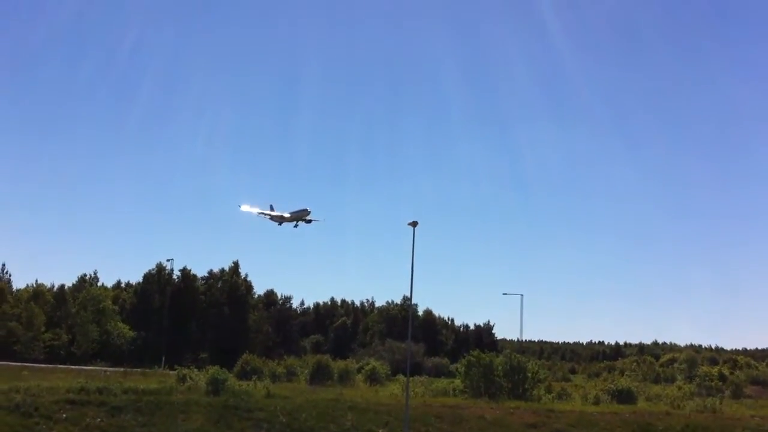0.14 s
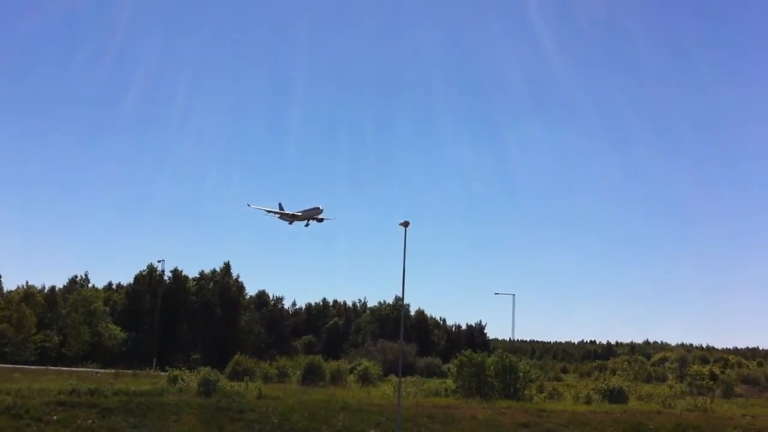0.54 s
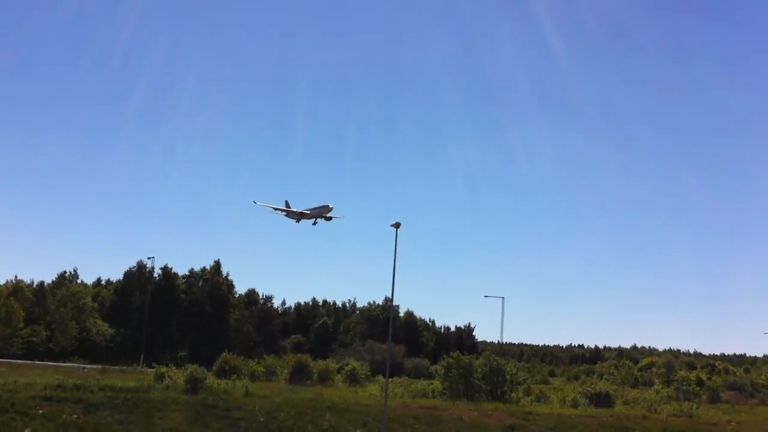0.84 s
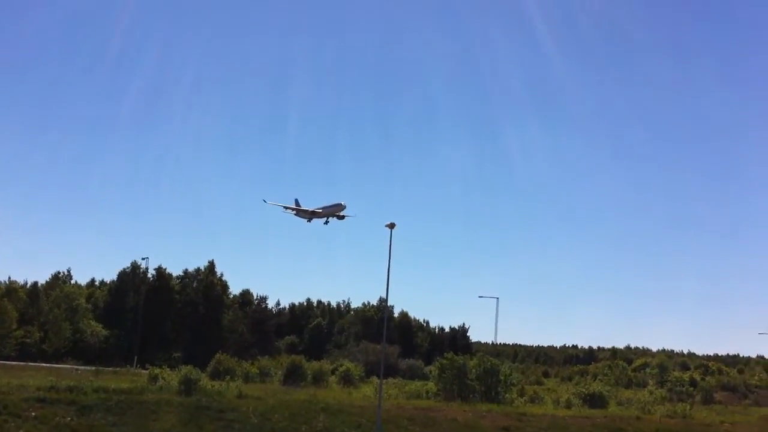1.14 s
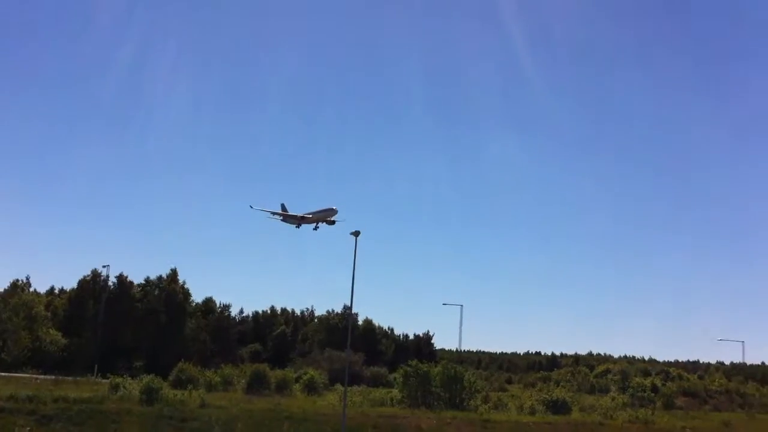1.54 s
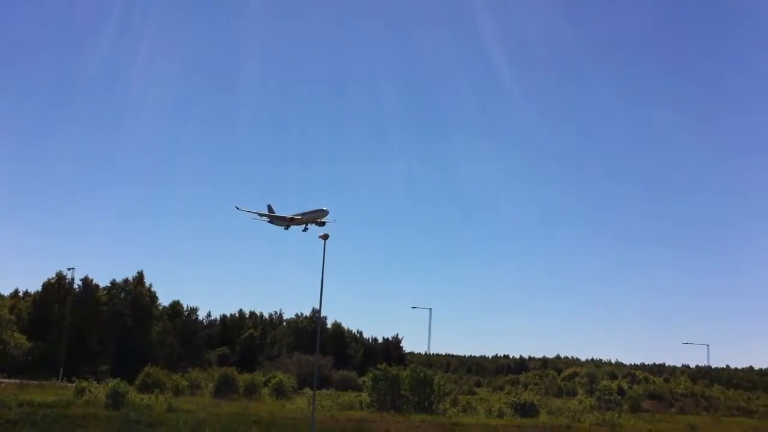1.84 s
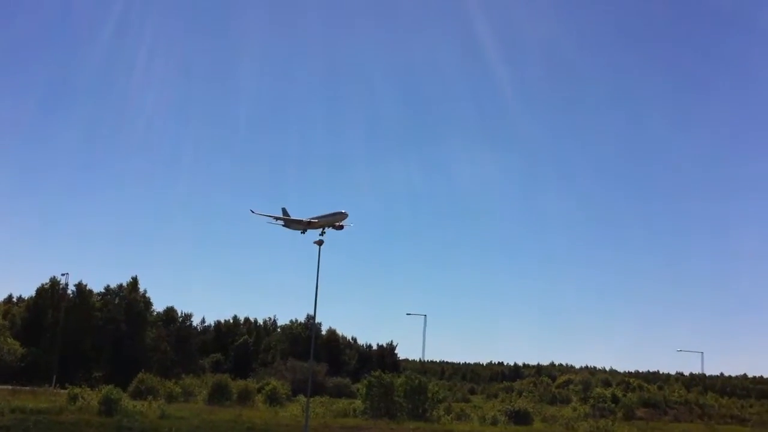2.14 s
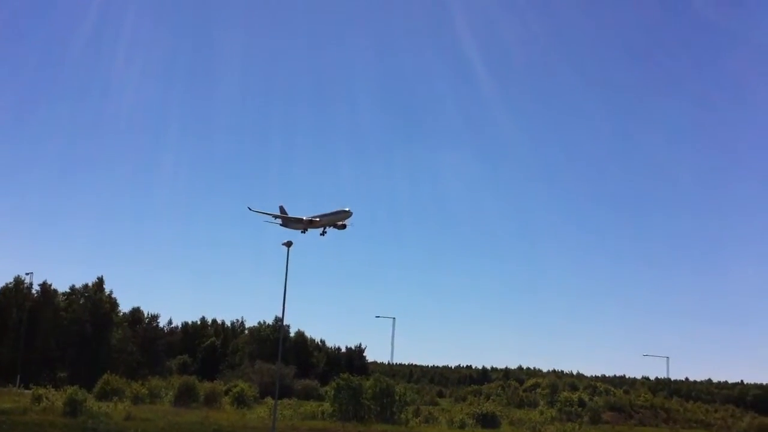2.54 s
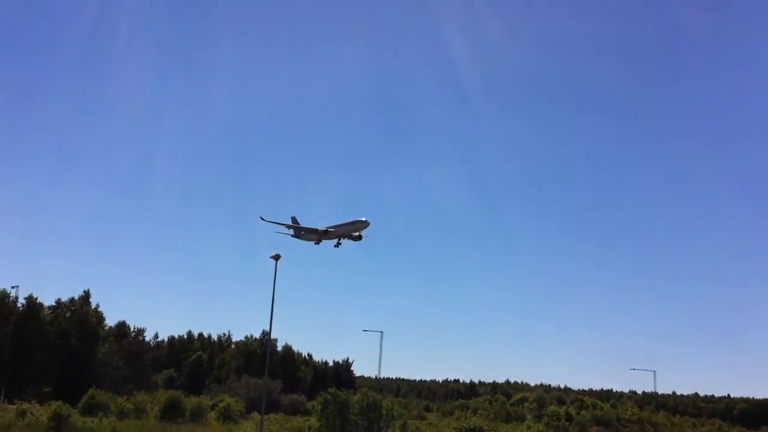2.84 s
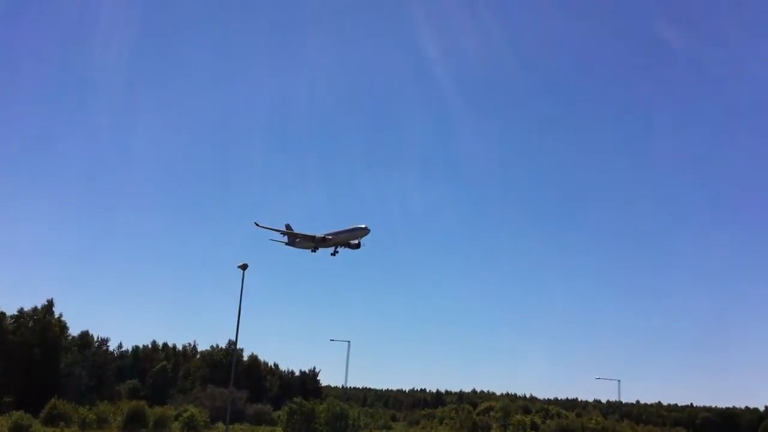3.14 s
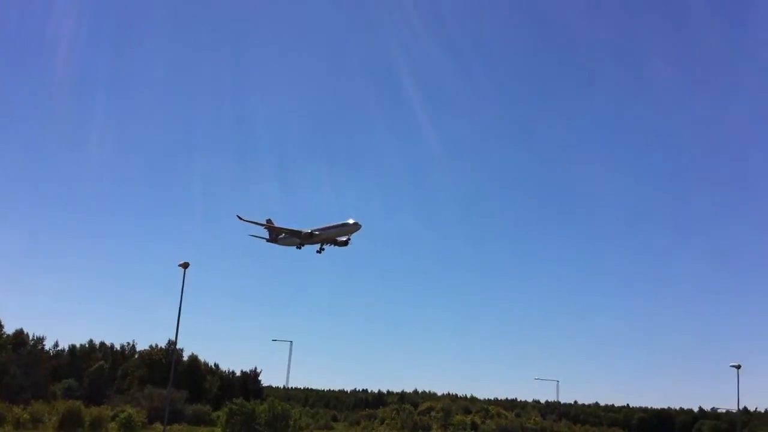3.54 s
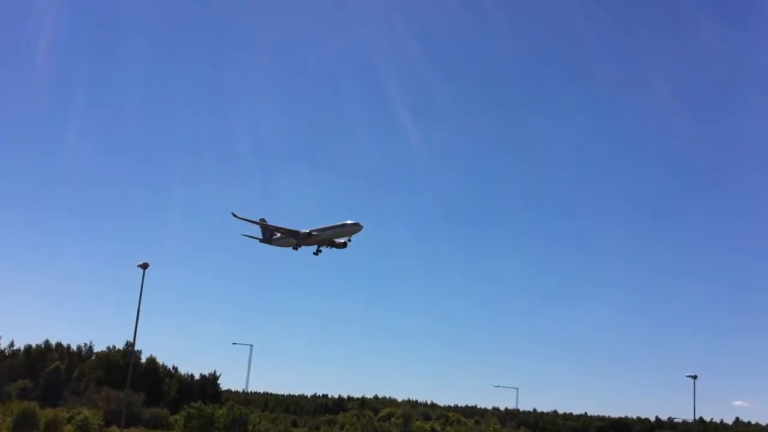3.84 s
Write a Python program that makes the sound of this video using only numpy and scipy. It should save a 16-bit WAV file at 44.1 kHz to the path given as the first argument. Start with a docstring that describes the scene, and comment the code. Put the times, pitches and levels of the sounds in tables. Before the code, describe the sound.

A jet airliner passes low over an open field, its rushing roar swelling and dipping under a whine that sinks in pitch; wind gusts flutter on the unshielded microphone, building to dense thumps and cracks.

```python
"""The roar of a jet airliner throughout, low over a windy field: noise mottled by the air and echoed by the ground.
Under its whine lies a rush of fan noise; whine and engine tones are blurred sines sinking as it draws level.
Gusts shake the microphone as fluttering noise, brighter the harder they blow, with crackle in the strong ones.
Short buffets slap and thump, bright spikes crack among them; a thin hiss, high-pitched noise, passes early on."""
import sys
import numpy as np
from scipy import signal
from scipy.fft import rfft, irfft
from scipy.io import wavfile
from scipy.ndimage import uniform_filter1d, minimum_filter1d, map_coordinates

SR = 44100
rng = np.random.default_rng(int(sys.argv[2]) if len(sys.argv) > 2 else 0)


def pcm_store(signal):
    """Save signal as 16-bit PCM."""
    levels = np.round(np.clip(np.atleast_2d(signal), -1, 1) * 32767)
    wavfile.write(sys.argv[1], SR, levels.astype(np.int16).T)


N = 176400
T = np.arange(N) / SR


def amp(db):
    """Decibels to amplitude gain."""
    return 10 ** (np.asarray(db) / 20)


def unit(x):
    """Scales to rms 1."""
    return x / np.sqrt(np.mean(x ** 2) + 1e-20)


def curve(rows):
    """The second column of a table against time, at every sample."""
    return np.interp(T, *np.transpose(rows)[:2])


def colour(rows, hz, axis=1):
    """One column of a spectrum table in dB, on a log-frequency axis."""
    rows = np.array(rows, float)
    return np.interp(np.log(hz + 1), np.log(rows[:, 0]), rows[:, axis])


def noise(rows, axis=1):
    """Steady noise of the given colour, rms 1."""
    hz = np.fft.rfftfreq(N, 1 / SR)
    white = rfft(rng.standard_normal(N))
    return unit(irfft(white * amp(colour(rows, hz, axis=axis)), N))


def wander(hz):
    """Smooth random motion of rms 1, its spectrum falling to 1/e at the given rate."""
    f = np.fft.rfftfreq(N, 1 / SR)
    slow = np.exp(-(f / hz) ** 2) * (f > 0)  # no constant offset
    return unit(irfft(rfft(rng.standard_normal(N)) * slow, N))


def steady(x, size=1500):
    """Divides a noise by its running level, averaged over windows of size samples, to even it out."""
    power = uniform_filter1d(uniform_filter1d(x ** 2, size), size)
    return x / np.sqrt(abs(power) + 1e-9)


# level of the jet's roar as heard, with its dips, before gain and swell: (time [s], level [dB])
ROAR_LEVEL = [(0, -39), (.25, -37.5), (.42, -36), (.5, -32.5), (.62, -32.5), (.8, -33), (1.05, -35),
              (1.37, -35), (1.58, -41), (1.64, -45), (1.9, -45.5), (2.28, -39), (2.46, -38.5),
              (2.65, -35.5), (2.8, -49), (2.95, -50), (3.2, -47), (3.4, -36), (3.68, -31.5), (4, -38)]
# roar spectrum, relative: (frequency [Hz], far level [dB per Hz], near level [dB per Hz])
ROAR_COLOUR = [(40.3, -24.5, -20.5), (150, 1.5, 7), (410, -10, 17.5), (580, 10, 19), (710, -3.5, 9),
               (960, 7, 6.5), (1170, 4.5, 8), (1680, 6.5, 3), (1820, 2.5, 0.5), (2300, 0, 0),
               (3050, -11.5, -8), (3260, -23, -23), (3800, -30.5, -33), (4980, -31, -27), (6900, -51, -58),
               (9700, -78, -76)]
ROAR_DB, ROAR_SWELL_DB, ROAR_PATCH_DB = 7, .5, 2  # gain, then rms depth of the two random motions
# the ground echo lags more as the jet climbs in the sky
ECHO_START_S, ECHO_END_S, ECHO_SHARE = 0.00264, 0.0052, 0.09


def roar():
    """Jet noise, mottled by turbulent air and combed by its echo from the ground."""
    frames, hz = N // 256 + 5, np.fft.rfftfreq(1024, 1 / SR)
    real, imaginary, patches = rng.standard_normal((3, frames, len(hz)))
    # patches of loud and soft, smooth over time and frequency
    patches = uniform_filter1d(patches, size=16, axis=0)
    patches = unit(uniform_filter1d(patches, size=7, axis=1))
    near = np.linspace(0, 1, frames)[:, None]
    far_db, near_db = colour(ROAR_COLOUR, hz, axis=1), colour(ROAR_COLOUR, hz, axis=2)
    db = (1 - near) * far_db + near * near_db
    field = (real + 1j * imaginary) * amp(db + ROAR_PATCH_DB * patches)
    direct = signal.istft(field.T, nperseg=1024, noverlap=768)[1][:N]
    lag = np.linspace(ECHO_START_S, ECHO_END_S, N)
    echo = map_coordinates(direct, [(T - lag) * SR], order=3)
    level_db = curve(ROAR_LEVEL) + ROAR_DB + ROAR_SWELL_DB * wander(7.7)
    return unit(direct + ECHO_SHARE * echo) * amp(level_db)


# the fan's rush, before its random waver: (time [s], level [dB])
RUSH_LEVEL = [(0, -40), (.25, -55), (.6, -35.5), (.85, -46), (1.05, -37.5), (1.35, -49), (1.65, -48),
              (1.9, -51), (2.05, -43), (2.3, -44), (2.5, -52), (2.65, -51), (2.9, -56.5), (3.5, -46.5),
              (4, -63)]
# rush spectrum, relative: (frequency [Hz], level [dB per Hz])
RUSH_COLOUR = [(1200, -32.5), (1950, -13), (2200, 2), (2420, -3.5), (2680, -12), (3050, -20), (3400, -28),
               (4100, -38.5), (8000, -69)]


def rush():
    """The band of broad fan noise just under the whine, its level wavering by 1 dB rms."""
    return noise(RUSH_COLOUR) * amp(curve(RUSH_LEVEL) + wander(25))


# pitch of the fan whine, before its wobble: (time [s], pitch [Hz])
WHINE_PITCH = [(0, 3905), (.5, 3820), (1.5, 3612), (3, 3255), (3.5, 3158), (4, 3068)]
# level of the whine, before its fading: (time [s], level [dB])
WHINE_LEVEL = [(0, -63), (.55, -67), (1.05, -59.5), (1.3, -58), (1.48, -64), (1.9, -63.5), (2.15, -59),
               (2.55, -56.5), (2.95, -67), (3.3, -59), (3.65, -48), (4, -61)]
# engine tones, levels against the whine:
# (multiple of whine pitch [ratio], level at start [dB], level at end [dB], width [Hz])
TONES = [(.972, -6, -10, 130), (1.455, -20, -14, 120), (1.315, -19, -15, 150), (1.045, -9, -20, 150),
         (.335, 22, -25, 30)]
WHINE_FADE_DB, WHINE_WOBBLE_HZ, WHINE_BLUR = 1.5, 6, .55  # rms depths; blur as a share of the tone


def whine():
    """A thin fan tone and fuzzier engine tones that sink together and waver in the air."""
    pitch_hz = curve(WHINE_PITCH) + WHINE_WOBBLE_HZ * wander(38)
    phase = 2 * np.pi * np.cumsum(pitch_hz) / SR
    in_step = (1 + WHINE_BLUR * wander(30)) * np.cos(phase)
    across = WHINE_BLUR * wander(28) * np.sin(phase)
    tones = unit(in_step + across)
    for multiple, start_db, end_db, width in TONES:
        blur = wander(width / 2) + 1j * wander(width / 2)
        fuzzy = unit((blur * np.exp(1j * multiple * phase)).real)
        tones += amp(np.linspace(start_db, end_db, N)) * fuzzy
    return tones * amp(curve(WHINE_LEVEL) + WHINE_FADE_DB * wander(13))


# the thin high hiss, before its flicker: (time [s], level [dB])
HISS_LEVEL = [(0, -65), (1.0, -64.5), (1.12, -61), (1.23, -55), (1.39, -63), (1.47, -48), (1.56, -50),
              (1.63, -56), (1.72, -54.5), (1.82, -68.5), (2.75, -65), (2.9, -66.5), (4, -81)]
# hiss spectrum, relative: (frequency [Hz], level [dB per Hz])
HISS_COLOUR = [(2000, -22), (6800, -7), (8500, 2), (11000, -1.5), (15500, 11.5)]
HISS_FLICKER_DB, HISS_FLICKER_HZ = 2, 45


def hiss():
    """A thin, flickering hiss of noise at the very top of the spectrum."""
    flicker_db = HISS_FLICKER_DB * wander(HISS_FLICKER_HZ)
    return noise(HISS_COLOUR) * amp(curve(HISS_LEVEL) + flicker_db)


# wind strength at the microphone, shared by rumble, rasp and crackle: (time [s], level [dB])
WIND_STRENGTH = [(0.0, -54), (0.04, -32), (0.09, -31.5), (0.12, -44), (0.17, -27), (0.24, -39.5),
                 (0.31, -28), (0.44, -37), (0.57, -23.5), (0.62, -29.5), (0.77, -30.5), (1.01, -18),
                 (1.05, -29.5), (1.17, -17.5), (1.28, -24), (1.31, -17.5), (1.44, -25), (1.47, -16.5),
                 (1.5, -29.5), (1.59, -15), (1.61, -27), (1.73, -36), (1.8, -26.5), (1.96, -42.5),
                 (2.03, -26), (2.07, -24), (2.13, -39.5), (2.15, -25.5), (2.39, -22), (2.42, -27.5),
                 (2.58, -19), (2.61, -27.5), (2.71, -18), (2.83, -22.5), (2.85, -17), (2.88, -22.5),
                 (3.11, -25.5), (3.13, -23.5), (3.16, -17), (3.21, -30.5), (3.25, -22), (3.32, -26),
                 (3.35, -21), (3.62, -18.5), (3.68, -18), (3.84, -18), (3.88, -14.5), (3.91, -26),
                 (3.94, -16), (4.0, -21.5)]
STRONG_WIND_DB = -20  # the strength about which growth pivots
RUMBLE_GROWTH, RASP_GROWTH = 1, 1.93  # dB of sound per dB of wind


def wind_db(growth, gain_db):
    """Level of a wind sound that rises by growth dB for each dB of wind strength."""
    return STRONG_WIND_DB + growth * (curve(WIND_STRENGTH) - STRONG_WIND_DB) + gain_db


# wind spectra, relative: (frequency [Hz], rumble level [dB per Hz], rasp level [dB per Hz])
WIND_COLOUR = [(20, -32.5, -61.5), (55.5, -26, -44.5), (97, -7.5, -30.5), (160.6, 1, -26.5), (250, -4, 8),
               (380, -8.5, -0.5), (830, -28, -4.5), (1400, -47.5, -14), (2520, -70, -34.5),
               (4040, -79, -54.5), (7060, -93.5, -85.5)]
RUMBLE_DB, RASP_DB = 0.88, -5  # gains
RUMBLE_FLUTTER_DB, RASP_FLUTTER_DB, FLUTTER_HZ = 3, 4.5, 117


def wind():
    """Eddies shake the microphone: a low rumble, and a fluttering rasp that grows faster with the gust."""
    flutter = wander(FLUTTER_HZ)
    rumble = steady(noise(WIND_COLOUR, axis=1) * amp(RUMBLE_FLUTTER_DB * flutter))
    rasp = steady(noise(WIND_COLOUR, axis=2) * amp(RASP_FLUTTER_DB * flutter))
    rumble_gain = amp(wind_db(RUMBLE_GROWTH, RUMBLE_DB))
    return rumble * rumble_gain + rasp * amp(wind_db(RASP_GROWTH, RASP_DB))


CRACKLE_DB, CRACKLE_PER_S, CRACKLE_LOW_HZ, CRACKLE_HIGH_HZ = -19, 220, 690, 1507


def crackle():
    """Small eddies snap at random on the microphone port, and stand out only in strong gusts."""
    snaps = rng.standard_normal(N) * (rng.random(N) < CRACKLE_PER_S / SR)
    band = [CRACKLE_LOW_HZ, CRACKLE_HIGH_HZ]
    port = signal.butter(N=2, Wn=band, btype="bandpass", fs=SR, output="sos")
    return unit(signal.sosfilt(port, snaps)) * amp(wind_db(RASP_GROWTH, CRACKLE_DB))


# single hard buffets on the microphone, before the slap and thump gains:
# (time of crest [s], length from crest to 1/e^2 [s], level [dB])
BUFFETS = [(0.553, 0.0066, -39), (0.999, 0.01, -34), (1.099, 0.0018, -10.5), (1.143, 0.0033, -12),
           (1.196, 0.0026, -4.5), (1.209, 0.0038, -8.5), (1.374, 0.0069, -16), (1.463, 0.01, -24),
           (1.595, 0.0035, -8), (1.632, 0.0043, -16), (1.658, 0.0078, -14.5), (2.014, 0.0089, -19.5),
           (2.057, 0.0083, -14), (2.391, 0.0095, -13.5), (2.484, 0.0024, -11), (2.555, 0.0072, -12),
           (2.671, 0.0021, -12), (2.697, 0.012, -15), (2.759, 0.0017, -8.5), (2.765, 0.0066, -10),
           (2.785, 0.0045, -12), (2.848, 0.0033, -13.5), (2.855, 0.0068, -7.5), (2.891, 0.0069, -14),
           (2.928, 0.003, -15.5), (2.953, .005, -14), (2.994, 0.0032, -13), (3.007, 0.0058, -10),
           (3.039, 0.0023, -13), (3.059, 0.012, -14.5), (3.07, 0.0023, -8), (3.092, 0.0021, -3.5),
           (3.102, 0.0016, -14.5), (3.149, 0.0084, -17.5), (3.165, 0.0046, -6), (3.25, 0.0051, -9.5),
           (3.284, 0.0024, -11), (3.376, 0.0043, -10), (3.415, 0.0088, -8.5), (3.45, 0.0017, -10),
           (3.472, 0.0053, -7), (3.571, 0.006, -7.5), (3.625, 0.0066, -9), (3.644, 0.0058, -6),
           (3.647, 0.0027, -10), (3.659, 0.0063, -6.5), (3.681, .003, -8), (3.695, 0.0018, -7),
           (3.713, 0.0041, -10), (3.733, 0.0027, -9.5), (3.768, 0.0018, -6), (3.793, 0.0014, -2),
           (3.799, 0.0025, -5), (3.886, 0.0069, -14), (3.943, 0.0027, -7)]
# spectrum of a buffet's slap, relative: (frequency [Hz], level [dB per Hz])
SLAP_COLOUR = [(40, -30), (150, -5), (350, 11.5), (750, 6), (1300, -6.5), (2400, -23.5), (4000, -58.5),
               (7000, -82), (12000, -85)]
SLAP_DB, THUMP_DB = -3, -2.5  # gains
THUMP_S, THUMP_HZ = 0.0083, 212.3  # decay to 1/e, and middle pitch for an eddy of length EDDY_S
EDDY_S, THUMP_SAG = .004, 0.32  # sag: exponent by which a longer eddy lowers the pitch


def buffets():
    """Single hard eddies: a short slap of noise, and a dying thump, lower for a longer eddy."""
    push, thump = np.zeros(N), np.zeros(N)
    chances = rng.uniform(-1.04, 1, (len(BUFFETS), 2))
    for (s, length, db), (detune, turn) in zip(BUFFETS, chances):
        at = slice(int((s - .03) * SR), int((s + .04) * SR))
        t = T[at] - s
        swell = np.exp(-2 * (t / length) ** 2)
        push[at] += amp(db) * swell
        # the thump builds with the push, then dies away
        ring = np.where(t < 0, swell, np.exp(-abs(t) / THUMP_S))
        hz = THUMP_HZ * (EDDY_S / length) ** THUMP_SAG * (1 + 0.26 * detune)
        thump[at] += amp(db) * ring * np.sin(2 * np.pi * hz * t + np.pi * turn)
    slap = push * steady(noise(SLAP_COLOUR), size=130)
    return amp(SLAP_DB) * slap + amp(THUMP_DB) * thump


# sharp cracks heard among the hard gusts, before the low cut and limiter: (time [s], peak level [dB])
CRACKS = [(1.594, -20), (2.707, -15.5), (2.757, -14), (2.855, -12), (2.892, -17.5), (3.062, -14),
          (3.102, -23), (3.16, -15), (3.38, -15), (3.415, -6.5), (3.66, -2), (3.709, -0.5), (3.787, -3.5),
          (3.964, -14)]
# spectrum of a crack, relative: (frequency [Hz], level [dB])
CRACK_COLOUR = [(200, -5), (800, 14), (1600, 11.5), (2600, 4.5), (4000, -21.5), (6000, -49), (10000, -62)]


def cracks():
    """Each crack is one short bright spike, placed in time by the phase of its spectrum."""
    hz = np.fft.rfftfreq(N, 1 / SR)
    shape = amp(colour(CRACK_COLOUR, hz, axis=1))
    spikes = sum(amp(db) * np.exp(-2j * np.pi * hz * s) for s, db in CRACKS)
    return irfft(spikes * shape, N) / irfft(shape, N).max()


def scene():
    """The jet, the hiss, the gusts and the cracks at one microphone."""
    jet = roar() + rush() + whine()
    gusts = wind() + crackle() + buffets()
    return (jet + hiss() + gusts + cracks())[None]


CEILING = .7  # share of full scale


def limit(x, size=45):
    """A fast limiter holds the hardest gusts under the ceiling, its gain smoothed over size samples."""
    gain = CEILING / np.maximum(abs(x), CEILING)
    held = minimum_filter1d(gain, 2 * size + 1)
    return x * uniform_filter1d(uniform_filter1d(held, size), size)


LOW_CUT_HZ, EDGE_HZ, FADE_S = 143, 15850, .004


def record(dry):
    """A low cut, the limiter, a soft start and stop, and the upper band limit."""
    low_cut = signal.butter(2, LOW_CUT_HZ, "highpass", fs=SR, output="sos")
    held = limit(signal.sosfilt(low_cut, dry))
    to_edge_s = np.minimum(T, T[::-1])  # time to the nearer end
    fade = np.sin(np.pi / 2 * np.minimum(to_edge_s / FADE_S, 1)) ** 2
    band = signal.firwin(511, EDGE_HZ, window=("kaiser", 9), fs=SR)
    return signal.oaconvolve(held * fade, band[None], "same")


dry = scene()
out = record(dry)
pcm_store(out)
```